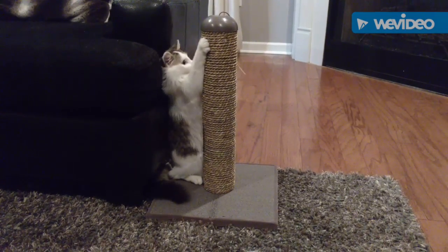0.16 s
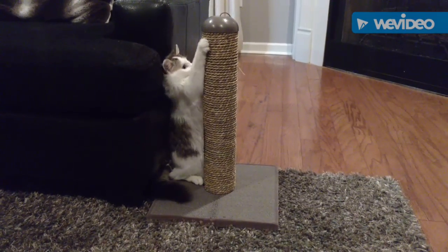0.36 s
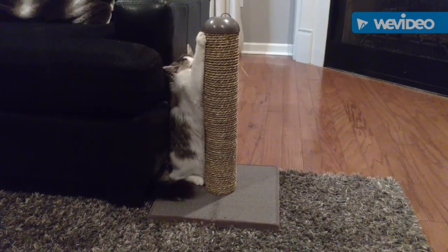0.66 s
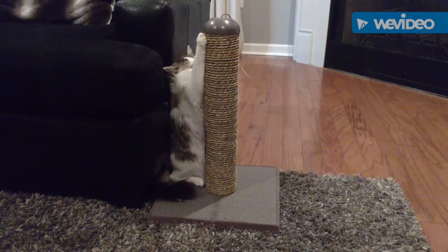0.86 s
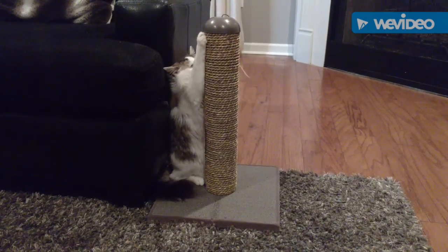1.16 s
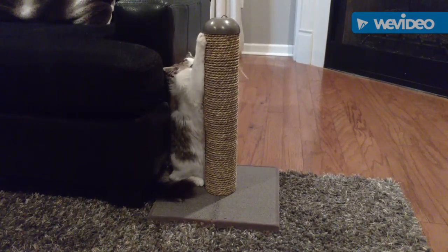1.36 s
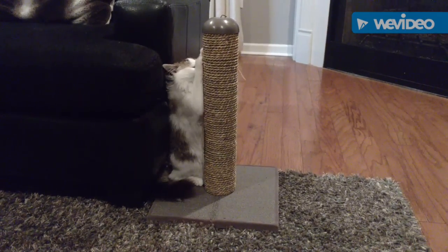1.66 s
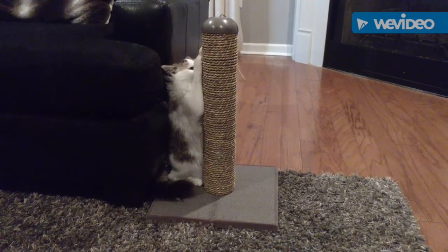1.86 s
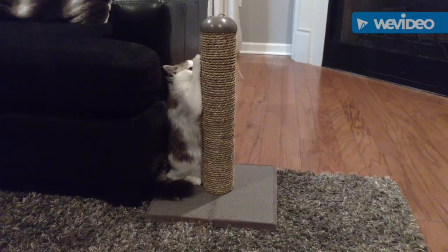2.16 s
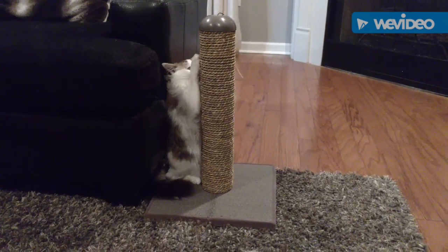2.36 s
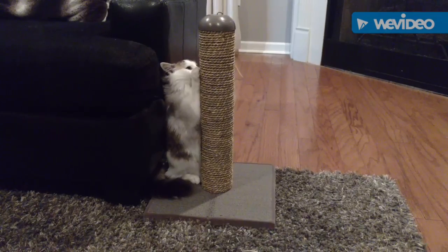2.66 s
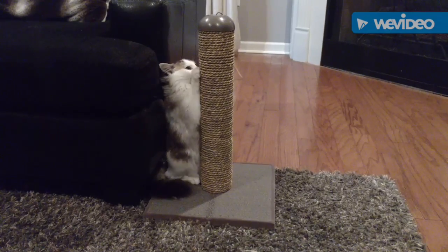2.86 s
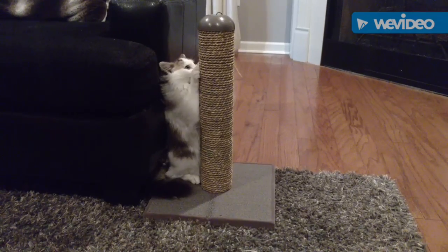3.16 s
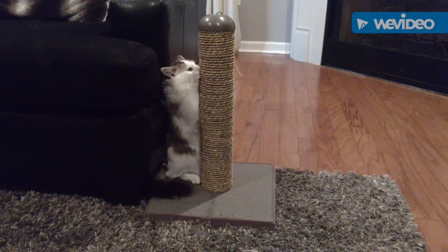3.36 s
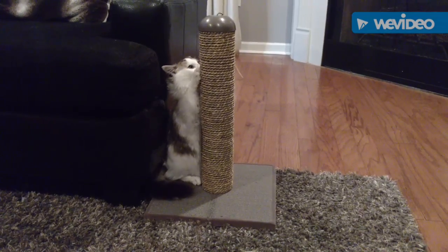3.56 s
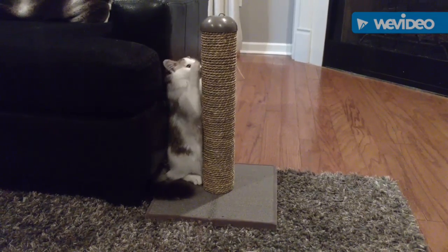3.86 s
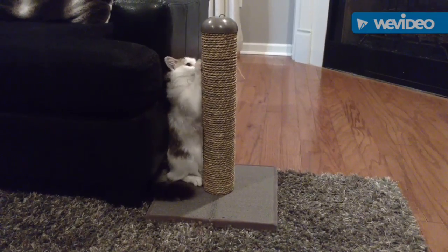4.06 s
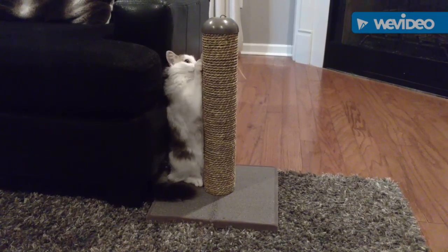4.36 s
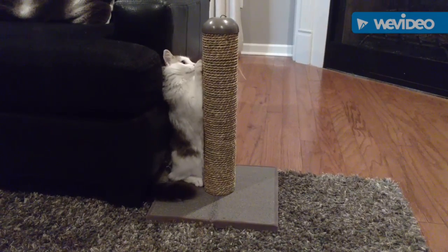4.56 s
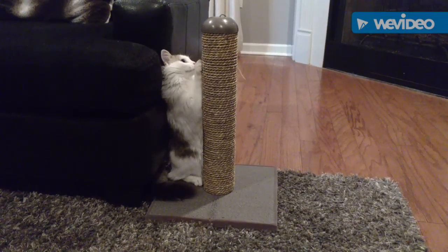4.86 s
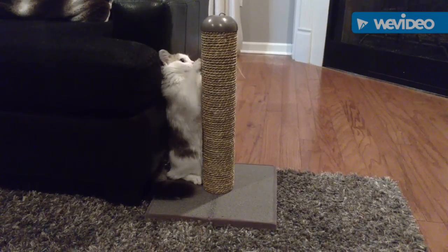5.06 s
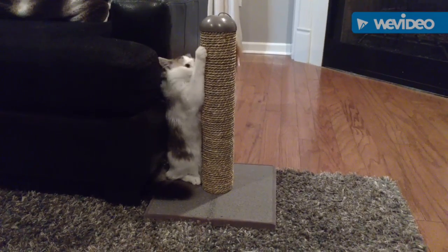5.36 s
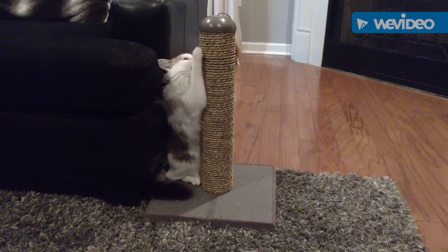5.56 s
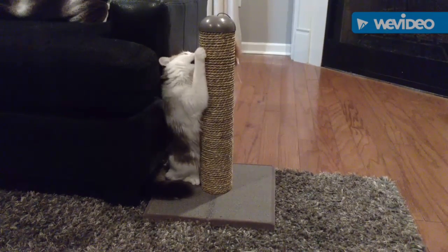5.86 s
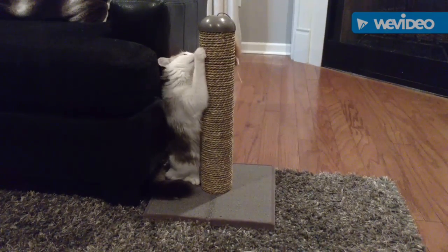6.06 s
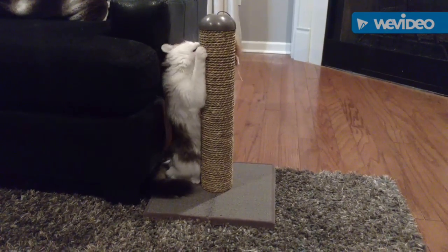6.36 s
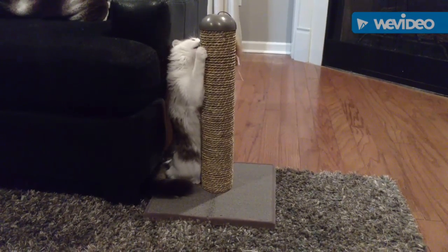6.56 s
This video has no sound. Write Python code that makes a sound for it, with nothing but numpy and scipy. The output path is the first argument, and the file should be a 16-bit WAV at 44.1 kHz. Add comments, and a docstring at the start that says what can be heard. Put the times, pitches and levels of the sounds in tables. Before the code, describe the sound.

In a quiet living room, a microphone a couple of metres away picks up a cat clawing a rope-covered post. Crisp clicks of snagging, tearing fibres come in uneven bursts, with dry scrapes as the paws slide. The scratching is strongest midway, then gives way to muffled fur scuffs and shuffling with a few last ticks. Steady low hum, light hiss and a very faint electric buzz lie underneath.

```python
"""Sharp little snaps and a dry rasp: a cat claws a rope-wrapped post in a living room.
Each claw snags and tears fibres loose in a burst of snaps that ring the hollow post and the room,
and claws and pads rasp as they slide over the rope. Fur and paws rub dully, mostly near the end.
Behind it all are the hum of the house and a faint electric buzz, heard by a phone two metres away."""
import sys
import numpy as np
from scipy import signal
from scipy.fft import rfft, irfft
from scipy.io import wavfile
from scipy.ndimage import uniform_filter1d

SR = 44100
rng = np.random.default_rng(int(sys.argv[2]) if len(sys.argv) > 2 else 0)


def dump(signal):
    """Clip the signal to [-1, 1] and save it as 16-bit WAV at the path in sys.argv[1]."""
    limited = np.clip(np.atleast_2d(signal).T, -1, 1)
    pcm = np.round(limited * 32767).astype(np.int16)
    wavfile.write(sys.argv[1], SR, pcm)


N = 296087

# tone of the house noise: (frequency [Hz], relative level [dB])
HOUSE_SPECTRUM = [(25, -34), (60, -24), (130, -10), (195, -7.5), (250, 1.5), (320, -3.5), (480, -8.5),
                  (700, -12.5), (1200, -15.5), (2300, -26), (3300, -13.5), (5000, -23.5), (8000, -21.5),
                  (14800, -23.5)]
# tones humming in the house: (pitch [Hz], level [dB])
HUM_TONES = [(253.0, -79.5), (678.3, -77.5), (845.2, -78), (1190, -79.5)]
# high peaks of the electric buzz: (centre [Hz], width [Hz], level [dB])
BUZZ_PEAKS = [(7770, 500, -80), (9600, 450, -82)]
# low, middle and high room echoes: (band label [Hz], time to fade 60 dB [s], relative level [dB])
ROOM_ECHOES = [(500, 0.34, -13), (3000, 0.17, -13.5), (9000, 0.17, -8.5)]
# the cat shifting its weight against the sofa: (time [s], level [dB])
SHUFFLE_LEVELS = [(5.2, -86), (5.5, -60.5), (5.8, -62), (6.05, -59), (6.3, -68), (6.55, -59), (6.71, -64)]
# tone of scuffing fur: (frequency [Hz], relative level [dB])
SCUFF_SPECTRUM = [(200, -12.5), (500, 9.5), (1100, 7), (2000, -1.5), (3300, -0.5), (6000, -9),
                  (9000, -14.5), (14000, -26)]
# rubs of fur and paws: (start [s], length before the fade [s], hollow pitch [Hz],
# relative hollow level [dB], relative scuff level [dB])
FUR_RUBS = [(0.625, 0.04, 990, -79, -74), (5.663, 0.08, 990, -59, -57.5), (5.793, 0.059, 324, -53.5, -64),
            (5.888, 0.12, 419, -49.5, -52), (6.049, 0.078, 486, -42, -52.5), (6.073, 0.045, 1070, -45, -40),
            (6.185, 0.055, 1130, -55, -62), (6.328, 0.075, 686, -50, -60.5), (6.693, 0.081, 323, -64, -56)]
# tone of the rasping rope: (frequency [Hz], relative level [dB])
RASP_SPECTRUM = [(200, -37), (500, -5), (1200, -7.5), (3200, 1.5), (5500, -1), (8000, -6.5), (11000, -11.5),
                 (15000, -19)]
# paw strokes over the rope: (time of full pressure [s], hold [s], rasp level [dB])
PAW_STROKES = [(.12, .05, -65), (.64, 0.033, -69.5), (1.28, 0.027, -68.5), (1.6, 0.074, -61),
               (1.9, 0.037, -64), (2.06, 0.031, -58), (2.57, 0.029, -56.5), (2.97, 0.034, -57.5),
               (3.09, 0.064, -49), (3.57, .05, -62), (3.86, 0.07, -59), (4.04, 0.089, -64),
               (4.3, 0.077, -52), (4.46, 0.02, -59), (4.66, 0.031, -61), (5.26, 0.045, -54.5),
               (5.45, 0.24, -66.5), (5.86, 0.27, -59), (6.06, 0.069, -57), (6.36, 0.018, -64),
               (6.69, .03, -59)]
# notes the hollow post rings at: (pitch [Hz], relative level [dB], time to fade 60 dB [s])
POST_MODES = [(480, -2.5, 0.078), (626, -20, 0.015), (739, -2, 0.068), (898, 2, 0.046), (1045, 1, 0.012),
              (1152, 5.5, 0.024), (1260, -7.5, 0.052), (1442, -2.5, 0.042), (1543, 5, 0.013),
              (1672, 9, 0.021), (1770, -12, 0.05)]
# pings of tight strands: (pitch [Hz])
STRAND_PITCHES = [5610, 6840, 7980, 8300]
# the claws moving along the post: (time [s], rope click pitch [Hz], pitch the post favours [Hz])
CLAW_PATH = [(0, 3050, 1050), (1.2, 3080, 840), (2.05, 3110, 690), (2.9, 3080, 1020), (3.6, 3100, 1050),
             (3.8, 3560, 1340), (3.9, 3440, 1250), (4.2, 2900, 1110), (4.6, 3180, 1060), (5.3, 3100, 1000),
             (6.1, 3020, 720)]
# claws catching the rope: (time [s], relative level [dB], tearing time [s],
# post ring against the click [dB], bright fibre sound against the click [dB])
CLAW_SNAGS = [(0.013, -50.5, 0.026, -2, -6), (0.046, -48, 0.0093, -0.5, 0), (0.062, -40.5, 0.017, -2.5, -4),
              (0.0713, -37.5, 0.036, -9, -9.5), (0.0952, -33.5, 0.005, 0.5, -3.5),
              (0.143, -45.5, 0.0071, -8, -2.5), (0.2276, -42.5, 0.021, 6, -5), (0.273, -45, 0.023, -7, -8),
              (0.5748, -51.5, 0.0083, -1.5, 3.5), (0.6241, -53, 0.07, -.5, -5.5),
              (1.2442, -40, 0.019, -1.5, -3), (1.37, -46.5, 0.0037, 4, -22), (1.5938, -43, 0.0083, -6, 0.5),
              (1.6071, -32, .01, -6.5, -3.5), (1.687, -40.5, 0.026, -12, -7), (1.859, -43, 0.006, -9, -16),
              (1.8647, -36, 0.02, -7.5, -1), (2.0227, -24, 0.0067, -11, -3.5), (2.0847, -45, 0.025, -20, 3),
              (2.4535, -57.5, 0.029, -2, 3), (2.5307, -28, 0.0068, -26, -3),
              (2.5344, -29.5, 0.014, -4, -2.5), (2.6879, -53, 0.0077, 6.5, 1.5),
              (2.783, -53, 0.037, -15, -6), (2.9142, -46, .004, -28, -6), (2.923, -56, .006, -16, 9),
              (2.9357, -39.5, 0.0054, -24, 3), (2.9436, -39, .018, -21, 3), (2.9764, -56, .034, -16, 9),
              (3.0177, -48, .005, -12, 2), (3.025, -37.5, 0.0091, -22, 3), (3.037, -38, .004, -20, -2),
              (3.0697, -22.5, 0.012, 0.5, -5.5), (3.0812, -26.5, 0.013, -10, -2.5),
              (3.1329, -30, 0.023, 1, -1.5), (3.1714, -47, 0.0069, -19, 9), (3.1795, -29, 0.0067, -11, -5),
              (3.1922, -52, 0.011, 11, 0), (3.4582, -56.5, 0.023, -9, 6.5), (3.5257, -35.5, 0.017, -12, -4),
              (3.603, -46.5, 0.038, -2.5, -6.5), (3.7232, -45.5, 0.036, -5, -9),
              (3.81, -34.5, 0.0018, -1, -6), (3.8147, -28, 0.0088, -8, 0.5),
              (3.8185, -21.5, 0.0077, -8.5, -19), (3.845, -35.5, 0.013, 3.5, 1),
              (3.8604, -40.5, 0.045, -6, -20), (3.958, -47, 0.0091, -9, -10), (3.9902, -54, .004, -8, 4),
              (4.0048, -42, 0.013, -31, 1.5), (4.0421, -44, .03, -20, -1),
              (4.2329, -41.5, 0.011, -18, -2.5), (4.2649, -41, 0.0045, -4, -5),
              (4.27, -27.5, 0.016, 1, -13), (4.2773, -27, 0.013, -10, -4), (4.288, -38.5, 0.0095, -3, 7.5),
              (4.3526, -26.5, 0.0078, 2, -4), (4.454, -39.5, .014, -4, 2.5), (4.514, -51, .008, -5, 1),
              (4.6158, -39, 0.0079, -8, -5), (4.631, -32.5, 0.0098, -30, -2.5),
              (4.6916, -41, 0.0089, -20, 3.5), (5.2231, -26, 0.0061, -5.5, -4.5),
              (5.234, -36.5, .011, -9, 1), (5.2421, -35.5, 0.0038, 2.5, -10), (5.28, -47, 0.041, 5.5, 7),
              (5.2909, -26.5, 0.0069, -7.5, -9.5), (5.312, -43, 0.0047, 2, -13),
              (5.3804, -50, .027, -2, -.5), (5.4295, -46, 0.021, -4, 1), (5.692, -53, .004, -12, 6),
              (5.6981, -46, 0.0075, -16, -10), (6.0575, -44.5, 0.05, 8.5, 1)]
# bands that cancel in the phone's microphone port: (centre [Hz], width [Hz], depth [0-1])
PORT_NOTCHES = [(2230, 500, .85), (2370, 500, .8), (4600, 900, .85), (6700, 700, .3), (8800, 600, .6),
                (11200, 800, .8), (13350, 900, .9)]


def undb(db):
    """Turn decibels into a gain."""
    return 10 ** (np.asarray(db) / 20)


def unit(x):
    """Scale a signal to an average (rms) level of 1."""
    return x / np.sqrt(np.mean(x ** 2))


def band(x, lo_hz, hi_hz):
    """Keep the sound between two frequencies."""
    return signal.sosfilt(signal.butter(2, [lo_hz, hi_hz], "band", fs=SR, output="sos"), x)


def keep_side(x, side, hz):
    """Keep the "low" or the "high" side of a frequency."""
    return signal.sosfilt(signal.butter(4, hz, side, fs=SR, output="sos"), x)


def coloured(spectrum):
    """Noise of level 1, shaped by (frequency [Hz], level [dB]) points."""
    hz, db = np.transpose(spectrum)
    freqs = np.fft.rfftfreq(N, 1 / SR) + 1
    gain = undb(np.interp(np.log(freqs), np.log(hz), db))
    return unit(irfft(rfft(rng.standard_normal(N)) * gain, N))


def wander(per_s):
    """A random drift of size about 1 that turns per_s times a second."""
    step = int(SR / per_s)
    stairs = np.repeat(rng.standard_normal(N // step + 1), step)
    return unit(uniform_filter1d(stairs, step)[:N])


def ring(blows, hz, fade_s):
    """Each blow starts a note that fades by 60 dB in fade_s."""
    decay, turn = np.exp(-np.log(1000) / (fade_s * SR)), 2 * np.pi * hz / SR
    return signal.lfilter([0, np.sin(turn)], [1, -2 * decay * np.cos(turn), decay ** 2], blows)


def house(rumble_db=-60, hiss_db=-66.5, split_hz=2660, flicker_db=1.94):
    """Low rumble and thin hiss flicker separately, under a few wavering hum tones."""
    t, noise = np.arange(N) / SR, coloured(HOUSE_SPECTRUM)
    out = unit(keep_side(noise, "low", split_hz)) * undb(rumble_db + flicker_db * wander(6.7))
    out += unit(keep_side(noise, "high", split_hz)) * undb(hiss_db + flicker_db * wander(24))
    for hz, db in HUM_TONES:
        wobble = np.cumsum(wander(2.6)) * 1.572 / SR
        out += np.sqrt(2) * undb(db) * np.sin(2 * np.pi * (hz * t + wobble))
    return out


def electric_buzz(pulse_hz=80.92):
    """Steady electric pulses, heard only through their overtones near two high peaks."""
    t, out = np.arange(N) / SR, 0
    for hz, width_hz, db in BUZZ_PEAKS:
        first, last = int((hz - 2 * width_hz) / pulse_hz), int((hz + 2 * width_hz) / pulse_hz)
        overtones_hz = pulse_hz * np.arange(first, last)
        weights = 1 / (1 + (2 * (overtones_hz - hz) / width_hz) ** 2)
        out += undb(db) * unit(weights @ np.cos(2 * np.pi * overtones_hz[:, None] * t))
    return out


def room(sound, gap_s=0.0023, edges_hz=(80, 1500, 5000, 16000)):
    """Add dense echoes off floor and walls; the low ones last longest."""
    t, tail = np.arange(SR // 2) / SR, 0
    for (_, fade_s, db), lo, hi in zip(ROOM_ECHOES, edges_hz, edges_hz[1:]):
        decay = 1000 ** (-t / fade_s) * (t > gap_s)
        share = np.sqrt(2 * (hi - lo) / SR)  # wider bands carry more sound
        echoes = unit(band(rng.standard_normal(len(t)), lo, hi))
        tail += undb(db - 21) * share * echoes * decay
    return sound + signal.fftconvolve(sound, tail)[:N]


def sofa_shuffle(lo_hz=243, hi_hz=606):
    """Fur rubs on cloth with a muffled, uneven sound."""
    times, db = np.transpose(SHUFFLE_LEVELS)
    uneven_db = np.interp(np.arange(N) / SR, times, db, left=-120) + 1.6 * wander(25)
    return undb(uneven_db) * unit(band(rng.standard_normal(N), lo_hz, hi_hz))


def fur_rubs(sharpness=9, grain_db=4.5):
    """Fur and paws make a grainy scuff, part of it gathered around one hollow pitch."""
    t, out = np.arange(N) / SR, 0
    scuff = coloured(SCUFF_SPECTRUM) * undb(grain_db * wander(150))
    noise = rng.standard_normal(N)
    for start, length, hz, hollow_db, scuff_db in FUR_RUBS:
        swell = np.interp(t - start, [0, 0.0056, length, length + 0.072], [0.00068, 0.78, 0.39, 0.027])
        hollow = unit(band(noise, hz * (1 - .5 / sharpness), hz * (1 + .5 / sharpness)))
        out += swell * (undb(hollow_db) * hollow + undb(scuff_db) * scuff)
    return out


def paw_pressure(press_db_per_s=174, lift_db_per_s=102, rest_db=-78.5):
    """How loud the rasp is as each stroke presses in, holds and lifts off."""
    t, power = np.arange(N) / SR, undb(rest_db) ** 2
    for start, hold, db in PAW_STROKES:
        before_db = press_db_per_s * np.maximum(start - t, 0)
        after_db = lift_db_per_s * np.maximum(t - start - hold, 0)
        power += undb(db - before_db - after_db) ** 2
    return np.sqrt(power)


def rope_rasp(ticks_per_s=3200, scatter_db=7, rustle=0.63):
    """Sliding claws and pads set off many tiny fibre ticks over a smoother rustle."""
    ticks = (rng.random(N) < ticks_per_s / SR) * undb(scatter_db * rng.standard_normal(N))
    tick_fade = np.exp(-np.arange(100) / 20)
    grain = unit(np.convolve(ticks, tick_fade)[:N]) + rustle
    return unit(grain * coloured(RASP_SPECTRUM)) * paw_pressure()


def fibre_snaps(t, tear_s, snaps_per_s=1000, tear_db=-12.5):
    """A few strands break at once, then weaker snaps follow as the claw drags and tears."""
    size = len(t)
    breaks = (rng.random(size) < snaps_per_s / SR) * undb(4.2 * rng.standard_normal(size))
    breaks *= rng.choice([-1, 1], size)
    drag = np.exp(-(t / np.clip(tear_s, .002, .06)) ** 3.4) * (t > .001)
    snaps = undb(tear_db) * breaks * drag
    # the hard first snap: four strands within two milliseconds
    snaps[0] = 0.73
    snaps[rng.integers(10, 90, size=3)] += 0.47 * rng.choice([-1, 1], size=3)
    return snaps


def post_knock(snaps, knock_hz):
    """Snaps ring the hollow post; the spot they land on favours the notes near knock_hz."""
    out = 0
    for hz, db, fade_s in POST_MODES:
        note_db = db - 4 * np.log2(hz / knock_hz) ** 2 + 2.5 * rng.standard_normal()
        note_hz = hz * (1 + 0.028 * rng.standard_normal())
        out += undb(note_db) * ring(snaps, note_hz, fade_s)
    return out


def snag(level_db, tear_s, post_db, bright_db, click_hz, knock_hz, size=6000):
    """One claw catches: snapping fibres click the rope, spit in the air and knock the post."""
    t = np.arange(size) / SR
    snaps = fibre_snaps(t, tear_s)
    puffs = np.convolve(abs(snaps), np.exp(-t[:200] / 0.00027))[:size]
    spit = puffs * rng.standard_normal(size)  # a tiny burst of noise for each snap
    click = ring(snaps, click_hz, fade_s=0.0032) + undb(11.5) * band(spit, 2160, 2630)
    strand_hz = rng.choice(STRAND_PITCHES) * (1 + 0.04 * rng.standard_normal())
    bright = band(spit, 2900, 10940) + undb(-6) * ring(snaps, strand_hz, fade_s=0.0039)
    knock = post_knock(snaps, knock_hz)
    strength = np.sqrt(np.mean(snaps ** 2)) * undb(level_db + 15.5)
    return strength * (unit(click) + undb(bright_db) * unit(bright) + undb(post_db) * unit(knock))


def claws(click_spread_octaves=0.024, knock_spread_octaves=0.15, bass_cut_hz=393):
    """All the snags, each on another spot of rope and post; the slim post gives off no bass."""
    out = np.zeros(N + SR)
    times, clicks_hz, knocks_hz = np.transpose(CLAW_PATH)
    strays = rng.standard_normal((len(CLAW_SNAGS), 2))
    for (time, *settings), (click_stray, knock_stray) in zip(CLAW_SNAGS, strays):
        click_hz = np.interp(time, times, clicks_hz) * 2 ** (click_spread_octaves * click_stray)
        knock_hz = np.interp(time, times, knocks_hz) * 2 ** (knock_spread_octaves * knock_stray)
        sound = snag(*settings, click_hz, knock_hz)
        start = int(time * SR)
        out[start:start + len(sound)] += sound
    return keep_side(out[:N], "high", bass_cut_hz)


def scene():
    """The cat echoes in the room over the house noise, in one channel."""
    cat = claws() + rope_rasp() + fur_rubs() + sofa_shuffle()
    return (room(cat) + house() + electric_buzz())[None]


def record(dry, top_hz=14900):
    """Sound reaches the phone's port by two paths that cancel in some bands; the top treble is cut."""
    for hz, width_hz, depth in PORT_NOTCHES:
        dry = dry - depth * signal.lfilter(*signal.iirpeak(hz, hz / width_hz, fs=SR), dry)
    return signal.sosfilt(signal.ellip(8, .2, 60, top_hz, fs=SR, output="sos"), dry)


dry = scene()
out = record(dry)
dump(out)
```